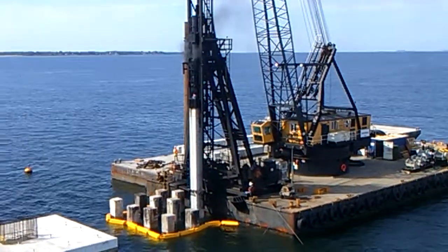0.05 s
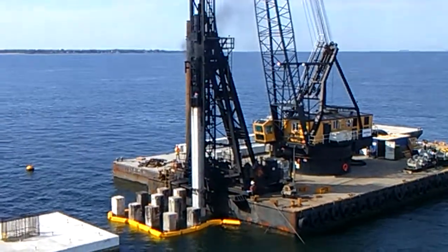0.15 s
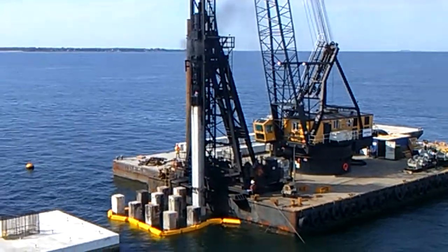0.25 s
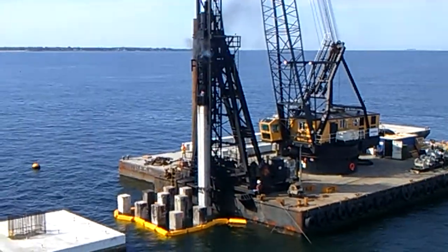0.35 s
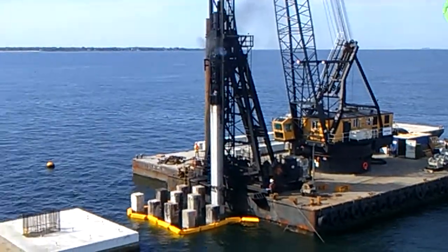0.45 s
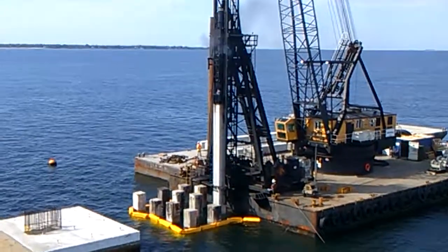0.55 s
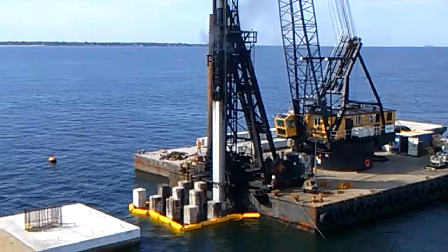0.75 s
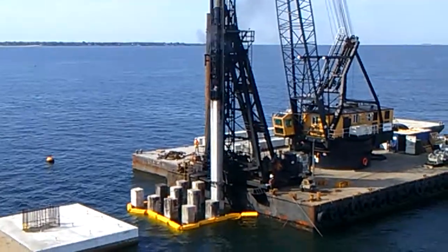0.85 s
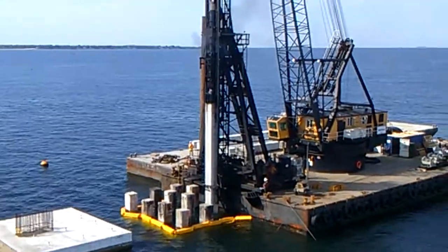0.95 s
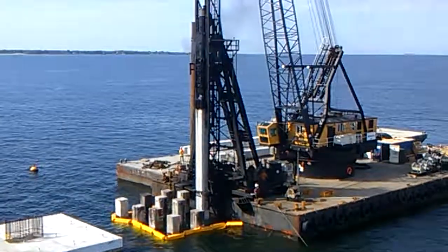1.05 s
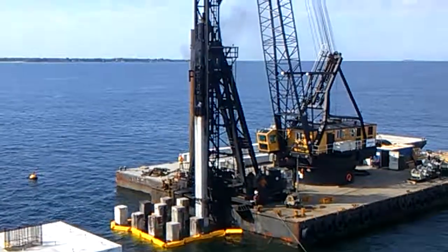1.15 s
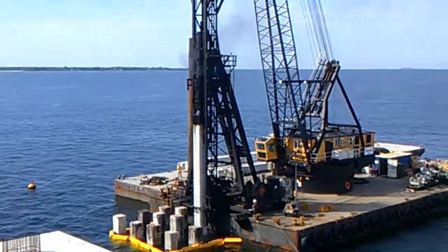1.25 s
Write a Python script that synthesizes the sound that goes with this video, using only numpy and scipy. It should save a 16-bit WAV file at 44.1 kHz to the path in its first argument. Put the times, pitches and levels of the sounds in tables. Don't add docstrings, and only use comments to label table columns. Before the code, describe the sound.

One heavy metallic pile-driving blow over open water, followed by a gassy burst and ringing decay

```python
import sys
import numpy as np
from scipy import signal
from scipy.io import wavfile

SR = 44100
rng = np.random.default_rng(int(sys.argv[2]) if len(sys.argv) > 2 else 0)


def dump(signal):
    limited = np.clip(np.atleast_2d(signal).T, -1, 1)
    pcm = np.round(limited * 32767).astype(np.int16)
    wavfile.write(sys.argv[1], SR, pcm)


def invert_db(level):
    return 10 ** (np.asarray(level, dtype=float) / 20)


N = 57330
BLOW_S, BLOW_DB = 0.368, -2

SIDES = np.array([[1], [-1]])
# pitch_hz [Hz], half_left_minus_right_db [dB]
LEAN = [(100, -2.5), (500, -0.6), (2000, 2.08), (4000, 3.5), (8000, -2), (12000, 2.3)]
# pitch_hz [Hz], density_db [dB per Hz]
CRASH = [(100, -18), (260, 1.5), (400, -12), (600, -1), (1300, -2.5), (2100, -2), (5000, -10.5), (9000, -9),
         (14000, -19)]
# start_s [s], left_db [dB], right_db [dB]
GUSTS = [(0, -39, -45), (.19, -36.5, -40), (.24, -34, -47), (.283, -27, -18.5), (.31, -31, -24.5),
         (.34, -30, -27.5), (.357, -29, -19.5), (.42, -30, -22.5), (.49, -26, -18.5), (.55, -30.5, -23),
         (.69, -22.5, -29), (0.758, -19.5, -20.5), (0.828, -29.5, -20), (.9, -30.5, -37), (1.0, -39, -50),
         (1.19, -40, -42), (1.23, -35.5, -41.5), (1.3, -34, -33)]


def rms_one(x):
    return x / np.sqrt(np.mean(x ** 2) + 1e-20)


def at_hz(points, hz):
    pitch_hz, value = np.transpose(points)
    return np.interp(np.log(hz), np.log(pitch_hz), value)


def drift(rate_hz):
    r = np.exp(-40 * np.pi * rate_hz / SR)
    slow = signal.lfilter([1], [1, -2 * r, r * r], rng.standard_normal(N // 20 + 2002))[2000:]
    return np.interp(np.arange(N) / 20, np.arange(len(slow)), rms_one(slow - slow.mean()))


def resonance(x, hz, width_hz):
    r = np.exp(-np.pi * width_hz / SR)
    return signal.lfilter([1, 0, -1], [1, -2 * r * np.cos(2 * np.pi * hz / SR), r * r], x)


def banded(spectrum, patchy_db, likeness=None, shape=lambda hz: 1):
    # pitch_hz [Hz], likeness [0 to 1]
    usual_likeness = [(100, .8), (500, .8), (1200, .72), (2500, .6), (5000, .35), (12000, .1)]
    likeness = likeness or usual_likeness
    out, power = 0, 0
    band_edges = 25 * 2 ** (np.arange(29) / 3)
    white = rng.standard_normal((2, 2, N + 4000))
    for k, (low, high) in enumerate(zip(band_edges, band_edges[1:])):
        band = signal.butter(3, [low, high], "band", fs=SR, output="sos")
        mid, side = signal.sosfilt(band, white[k % 2])[:, 4000:]
        hz = np.sqrt(low * high)
        alike = np.clip(at_hz(likeness, hz), 0, 1)
        gain = invert_db(at_hz(spectrum, hz))
        power += gain ** 2 * 4 * (high - low) / SR
        flicker = invert_db(patchy_db * drift(26) + at_hz(LEAN, hz) * SIDES)
        stereo = np.sqrt(1 + alike) * mid + np.sqrt(1 - alike) * side * SIDES
        out = out + gain * shape(hz) * flicker * stereo
    return out / np.sqrt(power)


def dying(start_s, rise_s, t60_s):
    t = np.maximum(np.arange(N) / SR - start_s, 0)
    return (1 - np.exp(-t / max(rise_s, 1e-4))) * invert_db(-60 * t / max(t60_s, 0.02))


def flow(rows):
    start_s, level_db = np.transpose(rows)
    return invert_db(np.interp(np.arange(N) / SR, start_s, level_db, left=-90, right=-90))


def from_right(x):
    return np.array([np.roll(x[0], 13), x[1]])


def bursts(rows):
    out, t = 0, np.arange(N) / SR
    for s, hz, level_db, length_s, pan_db in rows:
        bell = np.exp(-0.5 * ((t - s) / length_s) ** 2)
        out = out + invert_db(level_db + pan_db * SIDES) * bell * np.sin(2 * np.pi * hz * (t - s))
    return out


def harbour():
    hum_colour = [(60, -4), (200, 0), (430, -13), (1000, -11.5), (1600, -9.5), (3400, -21.5), (4700, -28.5),
                  (8000, -31.5), (14000, -57)]
    return invert_db(-33 + 1.53 * SIDES) * banded(hum_colour, patchy_db=2.0)


def air_hiss():
    air_colour = [(1500, -34), (4800, -23), (6000, -5.5), (7500, -5.5), (9000, 0.5), (11000, -5),
                  (14000, -22)]
    air_flow = [
        (0.0, -46),
        (0.086, -33),
        (0.102, -33),
        (0.112, -30),
        (0.182, -25),
        (0.36, -36.5),
    ]
    pan_db = np.interp(np.arange(N) / SR, [0.12, 0.28], [-3, 1.5])
    return flow(air_flow) * invert_db(pan_db * SIDES) * from_right(banded(air_colour, patchy_db=1.25))


def wind():
    wind_colour = [(25, -44), (50, 2.5), (100, -5), (200, -1), (320, -5.5), (500, -20), (1000, -37.5)]
    s, left_db, right_db = np.transpose(GUSTS)
    t = np.arange(N) / SR
    left = np.interp(t, s, left_db) + 2.3 * drift(16)
    right = np.interp(t, s, right_db) + 3.8 * drift(22)
    return invert_db(np.array([left, right])) * banded(wind_colour, patchy_db=2.0, likeness=[(30, 0.075), (300, 1.0)])


def port_tone():
    port_hz, width_hz, port_db, follows_gusts = 693, 400, -33.5, 0.12
    noise = resonance(rng.standard_normal((2, N)), port_hz, width_hz)
    mid, side = resonance(noise, port_hz, width_hz)
    s, left_db, _ = np.transpose(GUSTS)
    swing_db = np.interp(np.arange(N) / SR, s, left_db) + 33.5
    return invert_db(port_db + follows_gusts * swing_db + 3.37 * drift(61)) * rms_one(mid + 0.5 * side * SIDES)


def hoots():
    hoot_rows = [(.193, 795, -24, 0.0065, 3), (.237, 837, -11.5, 0.002, 7), (.248, 805, -18, 0.0036, -2),
                 (0.267, 940, -24.5, 0.0038, 3.5), (0.36, 770, -29, 0.0047, 4),
                 (.3655, 790, -17, 0.0015, -1), (.878, 830, -23, 0.0054, -3),
                 (1.135, 940, -43.5, 0.011, 13), (1.18, 900, -42, 0.0051, 10), (1.285, 780, -34, 0.01, 3),
                 (1.28, 950, -34, .008, 0), (1.6, 800, -30, 0.0053, 4), (1.18, 870, -34, 0.0049, 0),
                 (.11, 950, -38.5, 0.01, 12), (0.11, 230, -34, 0.0071, -3)]
    return bursts(hoot_rows)


def buffets():
    buffet_rows = [(.2825, 195, -14, 0.004, -4.5), (0.36, 150, -33, .004, -2),
                   (.355, 138, -15.5, 0.0028, -7), (0.47, 160, -26, 0.0064, -9),
                   (0.484, 102, -19, 0.012, -10), (0.51, 30, -23, 0.017, -10.5),
                   (0.25, 230, -33, 0.0033, -2), (1.225, 72, -24, 0.0099, -6), (0.19, 58, -31, 0.028, -9.5),
                   (0.12, 71, -28, 0.0062, 0.5), (.435, 342, -14, 0.0064, -5), (1.07, 182, -28, 0.018, 0.5),
                   (0.83, 70, -24, 0.0069, -7)]
    return bursts(buffet_rows)


def knocks():
    knock_rows = [(0.37, 2010, -8, .18), (.375, 630, -13, .25), (0.65, 530, -15, .25),
                  (.69, 640, -21, 0.18), (.70, 760, -22.5, .2), (.385, 575, -11, 0.27),
                  (.39, 1589, -14.5, 0.58), (0.38, 1312, -16, .3), (.43, 1900, -7, .12),
                  (0.42, 2150, -17, 0.34), (.78, 524, -19, 0.49), (.445, 700, -10.5, 0.21),
                  (.465, 600, -8, 0.31), (.505, 590, -16, 0.23), (0.71, 575, -13.5, .2),
                  (0.72, 580, -13, 0.15), (.845, 1600, -27, .12), (0.93, 2070, -33, .25),
                  (.91, 1600, -33, 0.29), (1.1, 2850, -26, .1), (1.018, 1600, -29, 0.22),
                  (1.03, 2080, -39, .4), (1.075, 2890, -37, 0.18), (1.14, 3010, -40.5, 0.74),
                  (1.19, 1600, -34, .3), (1.21, 1250, -33, 0.12), (0.26, 3400, -29.5, .06),
                  (0.17, 1900, -34, 0.091)]
    out, t = 0, np.arange(N) / SR
    for s, hz, level_db, t60_s in knock_rows:
        level = invert_db(level_db + 0.5 * SIDES + 3.0 * drift(21))
        out = out + level * dying(s, 0.0043, t60_s) * np.sin(2 * np.pi * hz * t + 0.45 * drift(20))
    return out


def crash():
    crash_t60 = [(100, 1.77), (500, 1.54), (1500, 0.86), (4000, 1.03), (10000, 0.79), (14000, 1.05)]

    def clatter(hz):
        return dying(BLOW_S, 0.00096 + 3 / hz, at_hz(crash_t60, hz))
    return invert_db(BLOW_DB) * banded(CRASH, patchy_db=0.6, shape=clatter)


def steel():
    mode_hz = [524, 573, 633, 690, 745, 826, 1312, 1380, 1589, 1604, 2003, 2077, 2153, 2908]
    # level_db [dB], t60_s [s]
    mode_rows = [(-5, 3.36), (0.5, 1.8), (3.5, 1.18), (6.5, 0.6), (-7, 0.35), (-16, 1.7), (-8, 0.84),
                 (4.5, 0.7), (3.5, 0.88), (-16, 2.67), (1, 0.91), (-11.5, 1.9), (-2, 1.04), (-10, 1.5)]
    # start_s [s], level_db [dB]
    sway = [
        (.37, -1.5),
        (.5, 0),
        (.57, -4),
        (.65, -2.5),
        (.84, 0.5),
        (.93, -4),
        (.98, -9),
        (1.04, 2.5),
        (1.1, -2),
        (1.3, 3),
    ]
    steel_db, rattle_hz, steady_over_s = -11.5, 12.6, 0.98
    out, t = 0, np.arange(N) / SR
    for hz, (level_db, t60_s) in zip(mode_hz, mode_rows):
        mid, side = resonance(rng.standard_normal((2, N)), hz, rattle_hz + 21 / t60_s ** 2)
        waver = rms_one(mid + 0.39 * side * SIDES)
        steady = np.sin(2 * np.pi * hz * t + rng.uniform(0, 5.6) + 0.32 * SIDES)
        clean = np.clip(t60_s - steady_over_s, 0.2, 1)
        ring = 0.82 * (1 - 0.54 * clean) * waver + 1.305 * steady * clean
        swell = dying(BLOW_S, 0.011 + 13.6 / hz, 2 * t60_s) ** 2
        out = out + invert_db(steel_db + level_db + at_hz(LEAN, hz) * SIDES) * swell * ring
    return out * flow(sway)


def tail():
    # pitch_hz [Hz], extra_db [dB]
    tail_tilt = [(100, 10), (600, 3), (2500, 9.5), (5000, -0.5), (9000, 0), (13000, -37)]

    def returned(hz):
        return invert_db(at_hz(tail_tilt, hz)) * dying(BLOW_S, 0.033, 3.5)
    return invert_db(BLOW_DB - 28) * banded(CRASH, patchy_db=2.3, shape=returned)


def exhaust():
    exhaust_colour = [(600, -24), (1200, -7.5), (2050, 1), (3000, 0), (3700, 1.5), (5400, -5.5), (8700, 1),
                      (14000, -9)]
    exhaust_flow = [
        (.49, -24),
        (.525, -12),
        (.545, -0.5),
        (.59, -3),
        (.625, -9.5),
        (.69, -15.5),
        (.76, -24),
        (.9, -29),
        (1.1, -51.5),
    ]
    after_s = np.maximum(np.arange(N) / SR - 0.6, 0)

    def dulling(hz):
        loss = 6.5 * max(np.log2(hz / 2000), 0) + 255 * max(np.log2(hz / 10000), 0)
        return invert_db(-after_s * loss)
    return flow(exhaust_flow) * invert_db(0.31 * SIDES) * banded(exhaust_colour, patchy_db=0.23, shape=dulling)


def echo():
    start_s, rise_s, hold_s, t60_s, level_db = 0.777, 0.012, 0.029, 0.088, -23
    t = np.arange(N) / SR - start_s
    fall_db = -60 * np.maximum(t - rise_s - hold_s, 0) / t60_s
    puff = invert_db(level_db + fall_db) * np.clip(t / rise_s, 0, 1) ** 2
    noise = rms_one(resonance(rng.standard_normal((2, N)), 5600, 2500))
    return puff * invert_db(-2.0 * SIDES) * noise


def scene():
    far_lowpass = signal.butter(4, 11300, fs=SR, output="sos")
    far = from_right(signal.sosfilt(far_lowpass, harbour() + tail()))
    ports = wind() + port_tone() + hoots() + buffets()
    hammer = air_hiss() + knocks() + crash() + steel() + exhaust() + echo()
    return far + ports + hammer


def top_cut(x):
    return signal.sosfilt(signal.butter(12, 14310, fs=SR, output="sos"), x)


def record(dry):
    limit_db, attack_s, release_db_per_s, clip_level = -6, 0.0023, 257, 1.05
    dry = signal.sosfilt(signal.butter(4, 49, "high", fs=SR, output="sos"), dry)
    r = np.exp(-1 / (attack_s * SR))
    power = signal.lfilter([1 - r], [1, -r], np.mean(dry ** 2, axis=0))
    level_db = 10 * np.log10(power + 1e-12)
    ramp = release_db_per_s * np.arange(N) / SR
    held_db = np.maximum.accumulate(level_db + ramp) - ramp
    limited = dry * invert_db(-np.maximum(held_db - limit_db, 0))
    mix = limited / (1 + np.abs(limited / clip_level) ** 4) ** 0.25
    return top_cut(mix)


dry = scene()
out = record(dry)
dump(out)
```